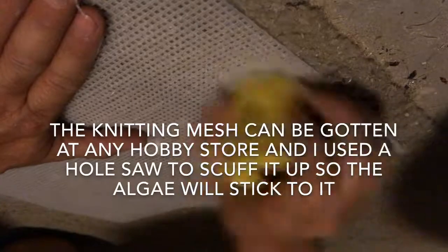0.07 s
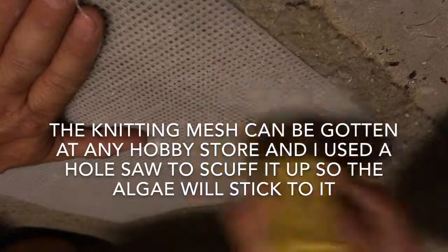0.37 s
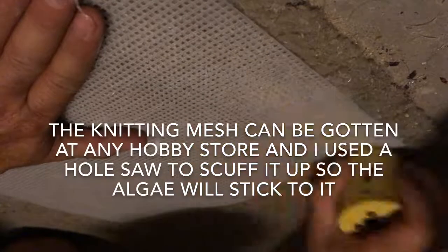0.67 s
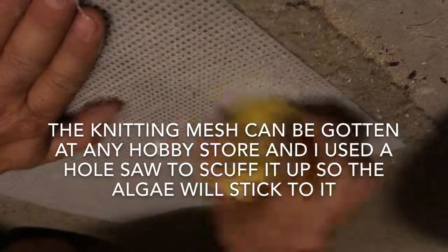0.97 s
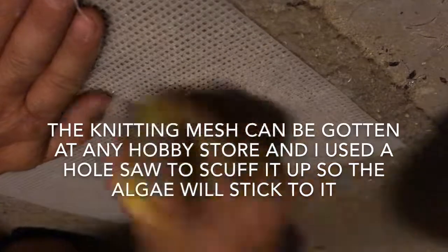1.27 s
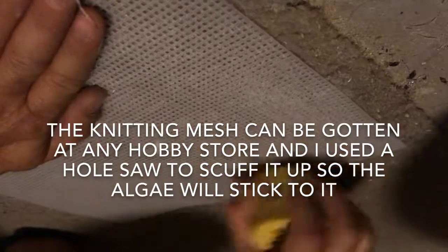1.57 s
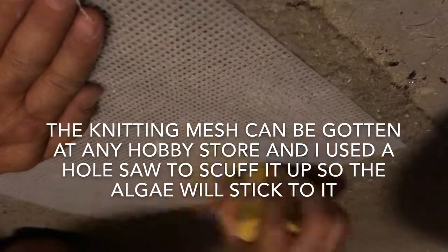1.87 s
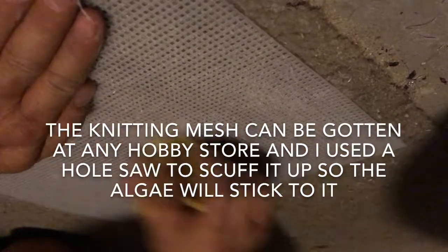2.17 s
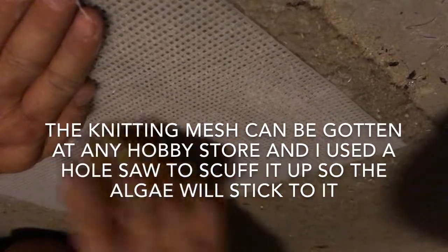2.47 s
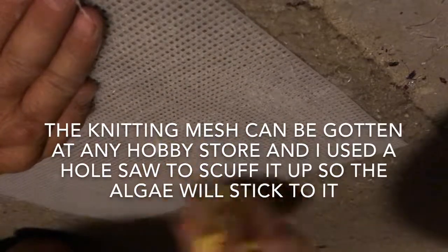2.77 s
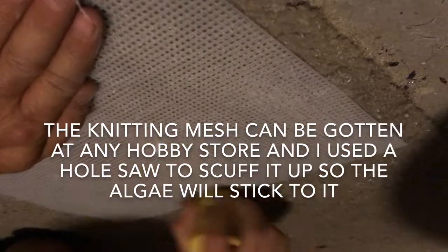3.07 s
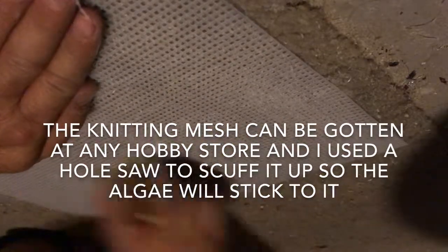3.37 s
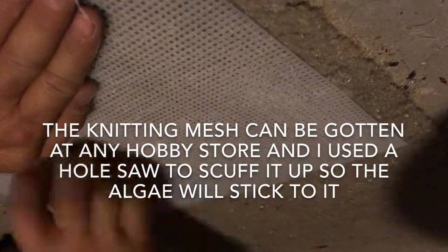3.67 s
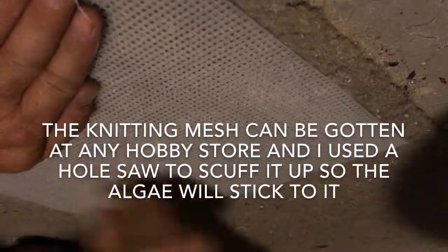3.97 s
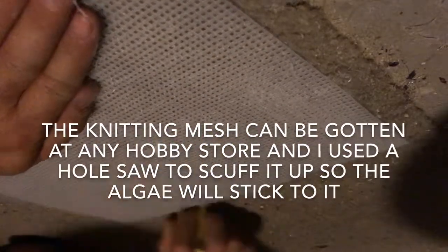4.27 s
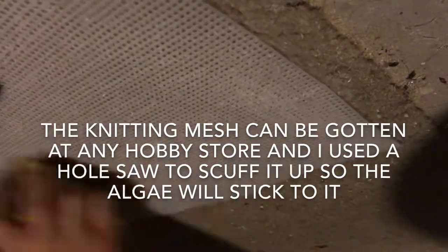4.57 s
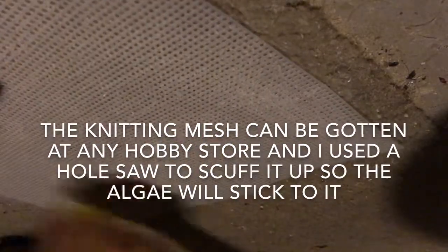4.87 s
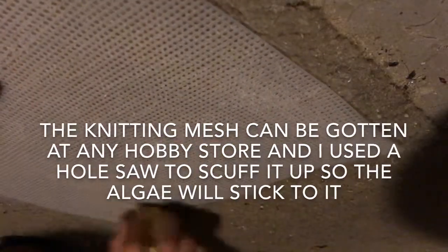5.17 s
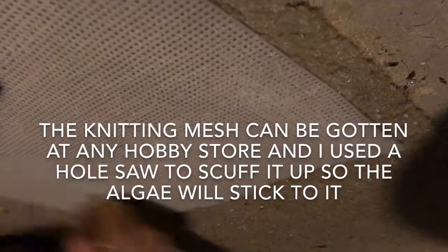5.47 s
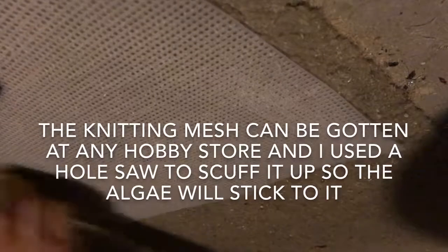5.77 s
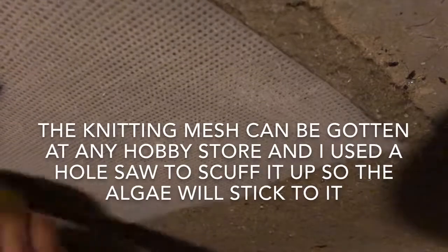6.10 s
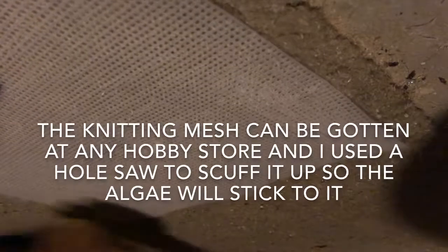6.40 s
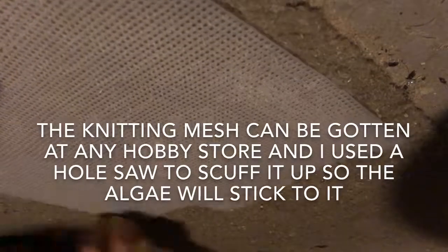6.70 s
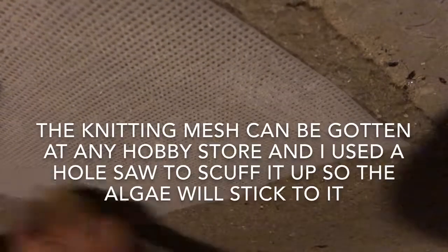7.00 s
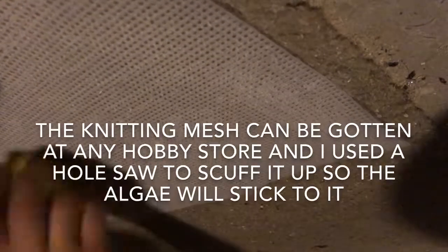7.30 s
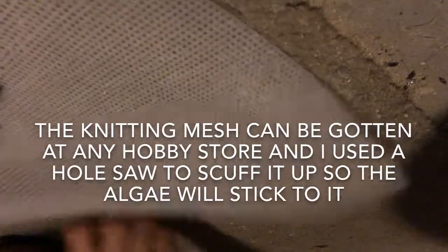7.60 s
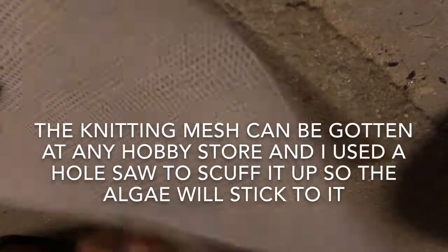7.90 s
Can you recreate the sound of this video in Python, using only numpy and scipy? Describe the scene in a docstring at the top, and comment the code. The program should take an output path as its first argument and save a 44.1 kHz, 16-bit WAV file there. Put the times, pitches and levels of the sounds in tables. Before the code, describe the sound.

A steel hole saw scrapes over plastic mesh in steady strokes, each starting with a knock and rasping into a zip.

```python
"""A steel hole saw is dragged by hand over plastic mesh on a concrete floor, in nineteen steady strokes.
Each time it lands with a knock, then its teeth zip over the ribs of the mesh: the faster the hand,
the higher the pitch. The saw's steel cup rings along. Teeth snag and snap free, most often in the
later strokes, and once the mesh sheet judders. The loose sheet rustles, mainly at the end.
Behind it all are a quiet room rumble and a faint echo."""
import sys
import numpy as np
from scipy import signal
from scipy.fft import rfft, irfft
from scipy.io import wavfile

SR = 44100
rng = np.random.default_rng(int(sys.argv[2]) if len(sys.argv) > 2 else 0)


def master_out(mix):
    """Clip the mix to full scale and print it as 16-bit PCM to the path in sys.argv[1]."""
    frames = np.transpose(np.atleast_2d(mix))
    ceiling = np.clip(frames, -1, 1)
    pcm = np.round(ceiling * 32767).astype(np.int16)
    wavfile.write(sys.argv[1], SR, pcm)


N = 354828
TIME = np.arange(N) / SR


def from_db(db):
    """Turn decibels into a volume multiplier."""
    return np.exp(np.asarray(db) * (np.log(10) / 20))


def rms_one(x):
    """Scale a signal to an average power of 1."""
    return x / np.sqrt(np.mean(x ** 2) + 1e-20)


def drift(turns_per_s):
    """A random wobble, about 1 in size."""
    points = rng.standard_normal(N // 8)
    return rms_one(np.interp(TIME * turns_per_s, np.arange(len(points)), points))


def keep_side(x, hz, side):
    """Keep the "low" or the "high" side of a frequency."""
    sos = signal.butter(2, hz, side, fs=SR, output="sos")
    return signal.sosfilt(sos, signal.sosfilt(sos, x + 1e-18))


def colour(x, spectrum, size=4096):
    """Give a sound the tone colour in a table of (pitch_hz, level_db) rows."""
    hz, db = np.transpose(spectrum)
    grid_hz = np.maximum(np.fft.rfftfreq(size, 1 / SR), 1)
    gain = from_db(np.interp(np.log(grid_hz), np.log(hz), db))
    # build a filter that rings only after a hit, never before it
    cepstrum = irfft(np.log(gain))
    response = irfft(np.exp(rfft(np.r_[0, 2 * cepstrum[1:size // 2]], size)))
    return signal.fftconvolve(x, response / np.linalg.norm(response))[:N]


def swell(rows, fade_s):
    """A volume curve through (time_s, level_db) rows, fading out beyond both ends."""
    time_s, db = np.transpose(rows)
    outside_s = np.maximum(np.maximum(time_s[0] - TIME, TIME - time_s[-1]), 0)
    return from_db(np.interp(TIME, time_s, db)) * np.maximum(1 - outside_s / fade_s, 0)


def add(track, start_s, sound):
    """Mix a short sound into a track."""
    start = max(round(start_s * SR), 0)
    track[start:start + len(sound)] += sound[:N - start]


def grains(per_s, spread_db):
    """Tiny fractures make clicks at random times."""
    sizes = from_db(spread_db * np.minimum(rng.exponential(1, N), 4))
    signs = rng.choice([-1, 1], N)
    return rms_one(sizes * signs * (rng.random(N) < per_s / SR))


# Tone colour of the quiet room: pitch_hz, level_db
ROOM_COLOUR = [(25, -34), (32, -21), (42, -1.5), (66, -7.5), (103, -9.5), (426, -20), (913, -22.5),
               (2100, -25), (3060, -31), (6210, -29.5), (7800, -36.5), (16000, -39)]

def room_noise(level_db=-61):
    """A steady low rumble with a little hiss."""
    return from_db(level_db) * colour(rng.standard_normal(N), ROOM_COLOUR, size=16384)


def room_echo(x, delay_s=0.0033, dull_fade_s=0.32, bright_fade_s=0.36):
    """The walls return a faint tail: a dull layer and a bright one, each falling 60 dB in its fade time."""
    t = TIME[:SR]
    noise = rng.standard_normal((2, SR)) * (t > delay_s)
    dull_fade = from_db(-60 * t / dull_fade_s)
    dull = signal.sosfilt(signal.butter(2, 3100, fs=SR, output="sos"), noise[0]) * dull_fade
    bright = noise[1] * from_db(-8 - 60 * t / bright_fade_s)
    tail = (dull + bright) / np.linalg.norm(dull_fade)
    return from_db(-12.5) * signal.fftconvolve(x, tail)[:N]


# Tone colour of the loose sheet: pitch_hz, level_db
RUSTLE_COLOUR = [(59, -31), (100, -6), (373, -12.5), (583, -2), (1360, -6.5), (1520, -7), (1680, -10),
                 (3050, -20.5), (12400, -19.5), (16000, -29)]
# The sheet slides and bends: start_s, length_s, level_db
SHEET_SLIDES = [(3.668, 0.12, -55), (6.95, 0.059, -50.5), (7.632, .16, -46.5), (7.856, 0.12, -55.5),
                (8.018, .06, -55)]

def rustle(edge_s=0.03):
    """The loose sheet crackles softly over the concrete; each slide starts quickly and runs down."""
    volume = np.zeros(N)
    for start_s, length_s, db in SHEET_SLIDES:
        end_db = db - 43 * length_s
        volume += swell([(start_s + edge_s, db), (start_s + length_s, end_db)], edge_s)
    return volume * colour(grains(per_s=2100, spread_db=0), RUSTLE_COLOUR)


# The sheet shakes as the saw creeps into one stroke: time_s, level_db
JUDDER_LEVELS = [(6.96, -44.5), (7.0, -45), (7.05, -32.5), (7.09, -42)]

def judder(pitch_hz=143, wobble=0.0785):
    """The saw sticks and slips unevenly, shaking a low tone out of the sheet."""
    phase = 2 * np.pi * np.cumsum(pitch_hz * (1 + wobble * drift(120))) / SR
    tone = np.sin(phase) + 0.53 * np.sin(2 * phase)
    flutter = from_db(3.9 * drift(150))
    return swell(JUDDER_LEVELS, fade_s=0.029) * rms_one(tone * flutter)


# Tone colour of the plastic mesh: pitch_hz, level_db
MESH_COLOUR = [(29, -13), (50, -22), (194, -5), (285, -3.5), (427, -6), (583, -2), (727, -0.5), (830, -1),
               (957, -0.5), (1670, 3), (1990, -3.5), (2450, -5), (2930, -14.5), (3330, -17), (3650, -14),
               (4000, -16), (5200, -30.5), (8800, -120)]

def mesh(push):
    """The plastic answers a push mostly with low and middle pitches."""
    return colour(push, MESH_COLOUR)


# Tone colour of the scratching tooth tips: pitch_hz, level_db
TOOTH_COLOUR = [(1500, -15.5), (2600, 6), (4300, -2), (5000, 0), (6000, 2), (7800, -5.5), (9500, 0),
                (12000, -7.5), (14300, -22.5), (16000, -19.5)]
# Notes of the steel cup, damped by the hand: pitch_hz, width_hz (wider dies sooner), level_db
CUP_NOTES = [(3654, 89, 4), (6142, 80, -10), (6404, 104, 1.5), (9088, 80, -8), (9930, 133, -1),
             (10740, 120, -5), (11000, 190, 0), (11455, 320, -1), (13020, 275, 2.5), (12640, 75, -11),
             (15000, 150, -6), (15400, 140, -13.5)]

def steel(push, ring_db=13, grip_db=1.5):
    """The tooth tips scratch and the cup rings; the shifting grip makes each note louder or softer."""
    out = colour(push, TOOTH_COLOUR)
    starts_s = np.array(SAW_STROKES)[:, 0]
    for k, (hz, width_hz, db) in enumerate(CUP_NOTES):
        decay = np.exp(-np.pi * width_hz / SR)
        feedback = [1, -2 * decay * np.cos(2 * np.pi * hz / SR), decay ** 2]
        gain = (1 - decay ** 2) / 2
        ring = signal.lfilter([gain, 0, -gain], feedback, push + 1e-18)
        grip = np.interp(TIME, starts_s, from_db(db + grip_db * rng.standard_normal(len(starts_s))))
        out += (-1) ** k * ring * grip * from_db(ring_db)
    return out / np.std(out) * np.std(push)


# Tone colour of a landing on the sheet: pitch_hz, level_db
THUD_COLOUR = [(30, -26), (70, 1), (150, 7.5), (300, -3), (600, -1.5), (1100, -2), (1600, -8.5),
               (2400, -30.5), (5000, -30), (16000, -35.5)]
# The saw lands: start_s, level_db
LANDINGS = [(0.126, -20), (0.547, -25.5), (0.986, -16), (1.38, -26), (1.795, -17.5), (2.179, -23.5),
            (2.581, -25), (2.976, -26), (3.368, -30), (3.761, -26.5), (4.15, -30), (4.596, -24.5),
            (5.02, -33.5), (5.431, -27.5), (5.823, -32), (6.202, -30.5), (6.601, -30.5), (7.0, -38),
            (7.403, -27.5)]

def knocks(lag_s=0.0092, lag_hz=200, scatter_s=0.002564, teeth=4, size=8192):
    """A few teeth touch down; the bending sheet carries the high pitches first and the low ones late."""
    t, hz = TIME[:size], np.maximum(np.fft.rfftfreq(size, 1 / SR), 30)
    colour_hz, colour_db = np.transpose(THUD_COLOUR)
    gain = from_db(np.interp(np.log(hz), np.log(colour_hz), colour_db))
    delay_s = lag_s * (lag_hz / hz) ** 1.2
    bending_wave = gain * np.exp(-2j * np.pi * np.cumsum(delay_s) * SR / size)
    touch_shape = np.minimum(t / 0.0063, 1) * np.exp(-t / 0.0086)
    thud, touch = np.zeros(N), np.zeros(N)
    for start_s, db in LANDINGS:
        taps_s = 0.0023 + scatter_s * rng.random(teeth)
        taps = sum((-.65) ** k * np.exp(-2j * np.pi * hz * s) for k, s in enumerate(taps_s))
        pulse = irfft(bending_wave * taps)
        add(thud, start_s - .002, from_db(db) * pulse / np.abs(pulse).max())
        add(touch, start_s - .001, from_db(db) * touch_shape * rng.standard_normal(size))
    tick = from_db(-25) * steel(touch, ring_db=-11)
    rattle = from_db(-17) * mesh(touch)
    return from_db(0.5) * thud + tick + rattle


# A tooth catches on a rib and snaps free: time_s, level_db, steel_db (added for the steel's part)
TOOTH_SNAGS = [(0.16, -16.5, -11), (0.241, -13, -12), (0.59, -14, -14), (1.632, -38, -6), (1.819, -25, -13),
               (1.835, -9, -11), (2.03, -41, -5), (2.207, -36, -17), (2.43, -26.5, -14), (2.831, -24, -6),
               (3.01, -14, -12), (3.399, -37, -21), (3.702, -38.5, 1.5), (3.806, -13, -27),
               (4.001, -24, -8), (4.385, -17, -20), (4.407, -12, -6.5), (4.576, -23.5, -18),
               (4.644, -7, -13.5), (4.659, -11, -20), (4.7, -10, -8), (4.714, -8, -14), (5.054, -17.5, -16),
               (5.143, -8.5, -10), (5.172, -8, -6.5), (5.191, -15.5, -9), (5.262, -26, -8),
               (5.476, -12.5, -8.5), (5.505, -8, -12.5), (5.584, -12, -8), (5.619, -15, -25),
               (5.668, -23, -12.5), (5.857, -17, -10.5), (5.882, -15, -14), (5.968, -9.5, -14),
               (5.993, -6.5, -22), (6.243, -24.5, -5), (6.273, -19.5, -4), (6.38, -14, -30),
               (6.43, -21, -14), (6.652, -10.5, -6), (7.039, -9, -18), (7.051, -20, -1), (7.087, -8, -14),
               (7.175, -7.5, -15), (7.425, -17.5, -12), (7.445, -12.5, -11), (7.462, -13.5, -6.5),
               (7.498, -14, -3), (7.514, -7, -10.5), (7.533, -9.5, -9.5)]

def snags(snap_s=0.002):
    """Each snap sends a short burst into the sheet and the cup, with a soft thump on the floor."""
    t = TIME[:SR // 30]
    sheet, cup = np.zeros(N), np.zeros(N)
    for time_s, db, steel_db in TOOTH_SNAGS:
        crackle = rms_one(rng.standard_normal(len(t)) * (rng.random(len(t)) < .3))
        burst = from_db(db) * t / snap_s * np.exp(1 - t / snap_s) * crackle
        add(sheet, time_s - .001, burst)
        add(cup, time_s - .001, burst * from_db(steel_db))
    plastic = keep_side(mesh(sheet), 250, "high")
    crack = from_db(-10) * rms_one(keep_side(keep_side(sheet, 1670, "high"), 2400, "low"))
    thump = from_db(-17) * rms_one(keep_side(keep_side(sheet, 110, "low"), 57, "high"))
    return from_db(-11) * (plastic + steel(cup) + np.std(sheet) * (crack + thump))


def sticking(lead_s=0.0056, width_s=0.0022, dip_db=-10):
    """Just before each snag lets go, the caught saw is nearly still, so the scrape dips."""
    t, caught = TIME[:SR // 40], np.zeros(N)
    bump = np.exp(-((t - t.mean()) / width_s) ** 2)
    for time_s, *_ in TOOTH_SNAGS:
        add(caught, time_s - lead_s - t.mean(), bump)
    return from_db(dip_db * np.minimum(caught, 1))


def rib_ticks(ribs_passed, jitter=.05, uneven_db=1, teeth=4):
    """A few teeth each tick once per rib, slipping a little early and late."""
    out = np.zeros(N)
    for tooth in range(teeth):
        place = ribs_passed + .3 * drift(9) + jitter * drift(300)
        furthest_rib = np.floor(np.maximum.accumulate(place))
        crossed = np.diff(furthest_rib, prepend=0) > 0
        out += crossed * from_db(uneven_db * rng.standard_normal(N)) * (-1) ** tooth
    return rms_one(out)


# The pure tones that make up the zip: multiple (of the rib rate), level_db
ZIP_TONES = [(1, -5), (2, -1.5), (3, 0), (4, -6), (5, -16)]

def zip_tone(ribs_passed, buzz_db, zip_db, waver_db=2.5):
    """Teeth riding the ribs in step pump the sheet into a tone, rougher where it is weak."""
    out = np.zeros(N)
    place = ribs_passed + 0.014 * from_db(-1.6 * zip_db) * drift(130)
    for multiple, db in ZIP_TONES:
        cycles = multiple * place + rng.random() + .03 * drift(50)
        level_db = db + waver_db * drift(45)
        if multiple == 1:  # the lowest tone swells with the buzz of the sheet
            level_db += .5 * (buzz_db + 21.5)
        out += from_db(level_db) * np.sin(2 * np.pi * cycles)
    return rms_one(out)


def hand_pressure(bite_db=13, arch_db=5.5, release_db_per_s=388, skim_db_per_s=116, fade_s=0.0039):
    """The teeth bite, press hardest mid-stroke, ease off, then skim the mesh as the saw lifts."""
    t, force = TIME[:SR // 3], np.zeros(N)
    for start_s, attack_s, hold_s, level_db, *_ in SAW_STROKES:
        bite = np.minimum(t / attack_s, 1)
        held = np.clip((t - attack_s) / hold_s, 0, 1)
        eased_s = np.maximum(t - attack_s - hold_s, 0)
        press_db = level_db - bite_db * (1 - bite) - arch_db * (2 * held - 1) ** 2
        release_db = np.maximum(-release_db_per_s * eased_s, -20.5 - skim_db_per_s * eased_s)
        add(force, start_s, from_db(press_db + release_db) * np.minimum(t / fade_s, 1))
    return force


# One drag of the saw per row: start_s, attack_s, hold_s, level_db, time_to_top_speed_s,
# half_speed_arc_s, top_ribs_per_s, zip_db, buzz_db, bright_db, steel_db, ring_db
SAW_STROKES = [ (.145, 0.0086, 0.14, -28, 0.092, 0.12, 332, -6.5, -9.5, -1, -4, 13.5),
               (.575, 0.031, 0.12, -26, 0.087, 0.094, 304, -9, -14, -8, -4.5, 10.5),
               (1.003, 0.023, 0.12, -27, 0.1, 0.099, 280, -1, -17.5, -4.5, -6, 13.5),
               (1.405, 0.026, 0.12, -24, 0.1, .10, 322, -1.5, -16, -8.5, -7, 13),
               (1.814, 0.012, 0.12, -24, 0.07, 0.12, 283, -8, -22.5, -11.5, -7, 10),
               (2.2, 0.013, 0.14, -26, 0.086, .12, 301, -4, -13, -7, -7, 12),
               (2.6, 0.021, .13, -25, .091, .11, 309, -6.5, -18, -9, -6.5, 14),
               (3.002, 0.014, 0.12, -25, 0.085, .125, 303, -7.5, -17.5, -9.5, -7, 13.5),
               (3.392, 0.017, .14, -27, .098, .10, 356, -4.5, -16.5, -5, -4.5, 12),
               (3.793, 0.014, 0.12, -28.5, .075, 0.092, 321, -12, -7, -4, -5, 14),
               (4.17, 0.02, 0.12, -26.5, 0.094, .17, 382, -13, -8.5, -3, -6, 14.5),
               (4.625, .04, 0.14, -28, 0.1, .15, 320, -11, -13, 0, -6.5, 14.5),
               (5.044, 0.028, 0.11, -26.5, .066, .15, 294, -21, -11, 0, -5.5, 12),
               (5.445, 0.037, 0.12, -29, 0.092, .12, 340, -8, -10, 0.5, -5.5, 12.5),
               (5.84, 0.036, 0.11, -26, .110, 0.16, 288, -17, -13.5, -0.5, -8, 14),
               (6.222, 0.032, 0.1, -28, 0.079, 0.18, 334, -11, -8, -2.5, -6.5, 12.5),
               (6.62, 0.028, 0.13, -30, 0.057, 0.18, 333, -10, -9, -2.5, -6, 11.5),
               (6.995, 0.053, 0.13, -28, 0.13, .17, 336, -23, -13, -1.5, -7, 11.5),
               (7.405, 0.027, 0.098, -29.5, .095, 0.15, 288, -11.5, -12, 1, -4, 7.5)]

def saw_scrape(slowest=.25, buzz_below_hz=460, bright_above_hz=1200):
    """The hand speeds up and slows in an arc; the ticks follow it, with grit torn loose at every rib."""
    strokes = np.array(SAW_STROKES)
    current = strokes[np.searchsorted(strokes[1:, 0], TIME)].T  # each sample's stroke settings
    start_s, _, _, _, top_s, half_s, ribs_per_s, zip_db, buzz_db, bright_db, steel_db, ring_db = current
    progress = (TIME - start_s - top_s) / half_s  # 0 at top speed
    speed = np.maximum(1 - progress ** 2, slowest)
    ribs_passed = np.cumsum(ribs_per_s * speed) / SR
    ticks = rms_one(rib_ticks(ribs_passed) / np.sqrt(speed))
    rib_pulse = 1 + 0.35 * np.cos(2 * np.pi * ribs_passed)
    grit = rms_one(grains(per_s=14000, spread_db=2.5) * rib_pulse)
    buzz = rms_one(keep_side(mesh(ticks + from_db(1) * grit), buzz_below_hz, "low"))
    body = keep_side(mesh(ticks + from_db(5) * grit), buzz_below_hz, "high")
    # a tilted saw bites with fewer teeth and sounds brighter
    dull = rms_one(keep_side(body, bright_above_hz, "low"))
    bright = rms_one(keep_side(body, bright_above_hz, "high"))
    rasp = (dull + from_db(bright_db) * bright) / np.sqrt(1.345 * (1 + from_db(2 * bright_db)))
    # the teeth fall into step around mid-stroke, trading rasp for tone
    in_step = from_db(zip_db + 3) * np.interp(progress, [-.8, -.1, .4, .9], [.15, 1, 1.2, .9])
    tone = in_step * zip_tone(ribs_passed, buzz_db, zip_db)
    sheet = (rasp + tone) / np.sqrt(1 + 0.49 * in_step ** 2)
    # slow teeth thud, fast teeth scratch
    buzz *= from_db(buzz_db + 5.3 * (1.37 - speed))
    scratch = steel(grit + 0.12 * ticks, ring_db) * from_db(steel_db + 3.47 * (speed - 1.57))
    flutter = from_db(1.53 * drift(140))
    return hand_pressure() * sticking() * flutter * (buzz + sheet + scratch)


def scene():
    """Saw and sheet close by, over quiet room noise, in one channel."""
    work = saw_scrape() + knocks() + snags() + judder() + rustle()
    background = room_noise()
    return keep_side(work + room_echo(work), 40, "high")[None] + background


def record(dry, cutoff_hz=16000):
    """Cut away the very highest treble steeply."""
    return signal.sosfilt(signal.ellip(10, .2, 80, cutoff_hz, fs=SR, output="sos"), dry)


dry = scene()
out = record(dry)
master_out(out)
```